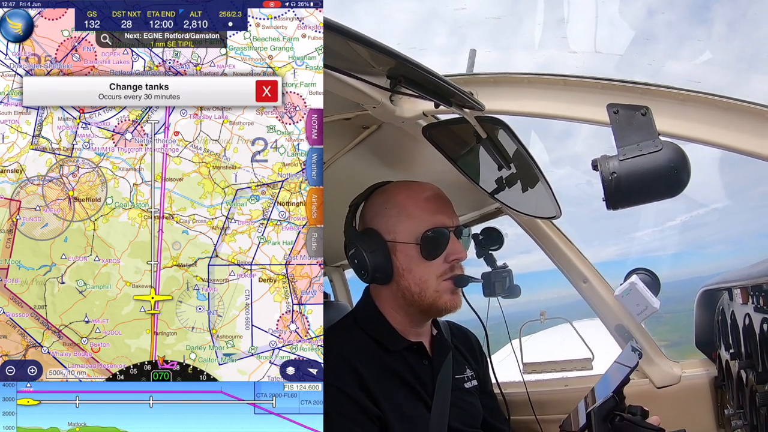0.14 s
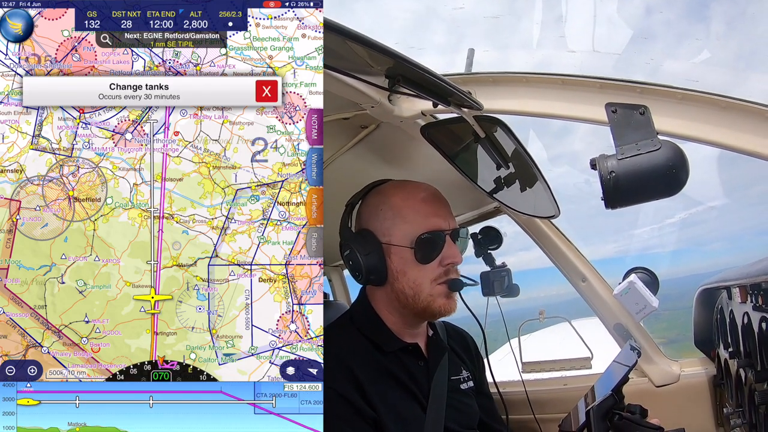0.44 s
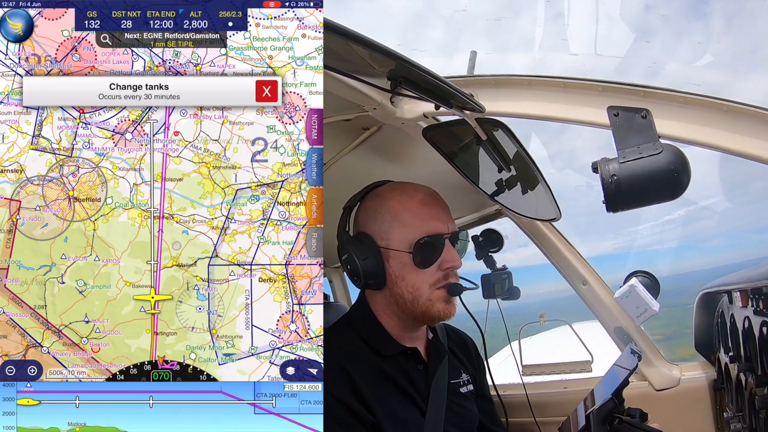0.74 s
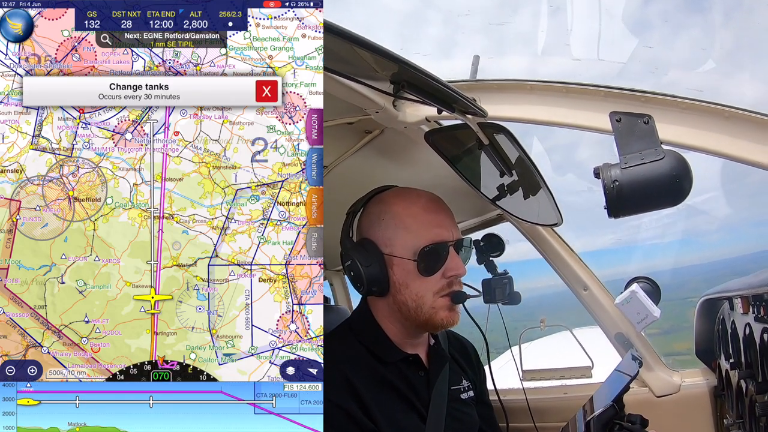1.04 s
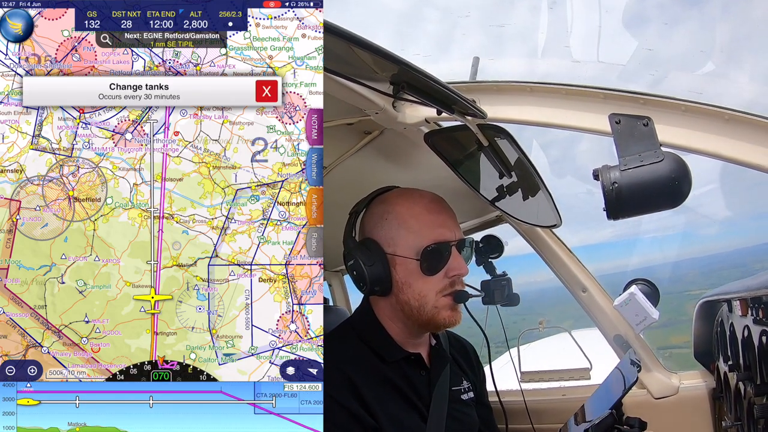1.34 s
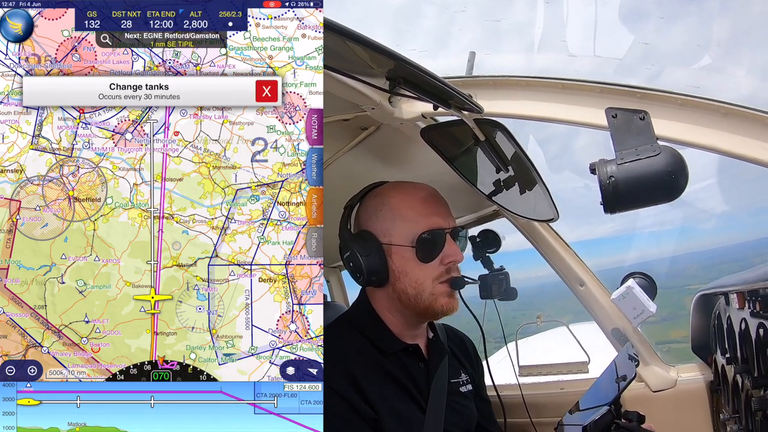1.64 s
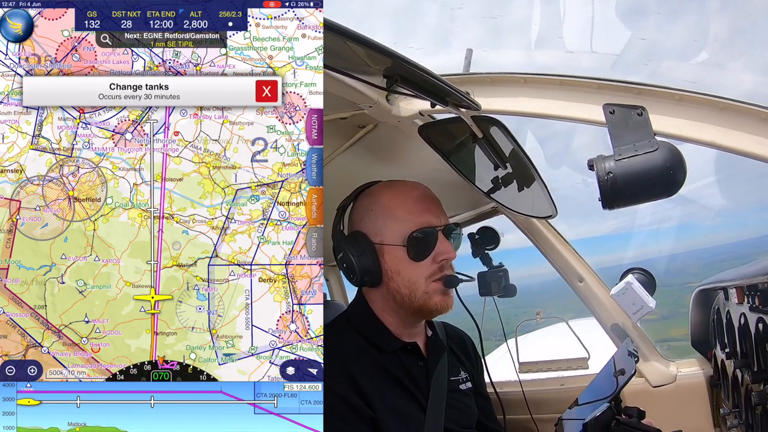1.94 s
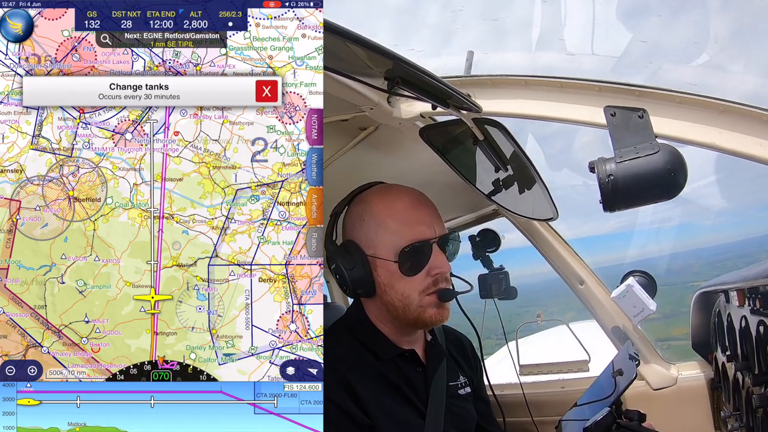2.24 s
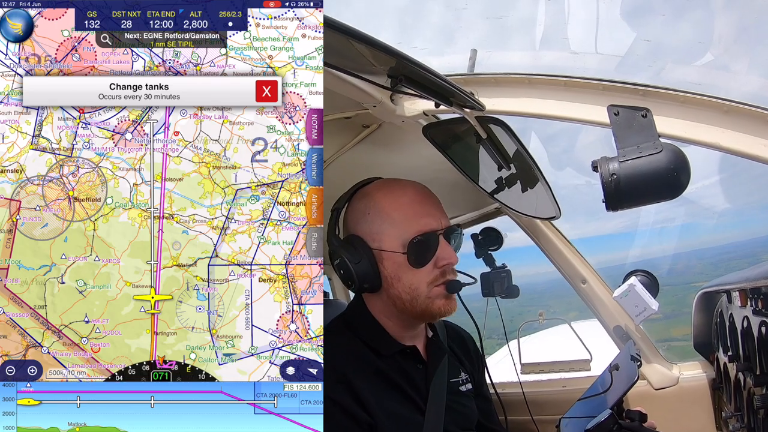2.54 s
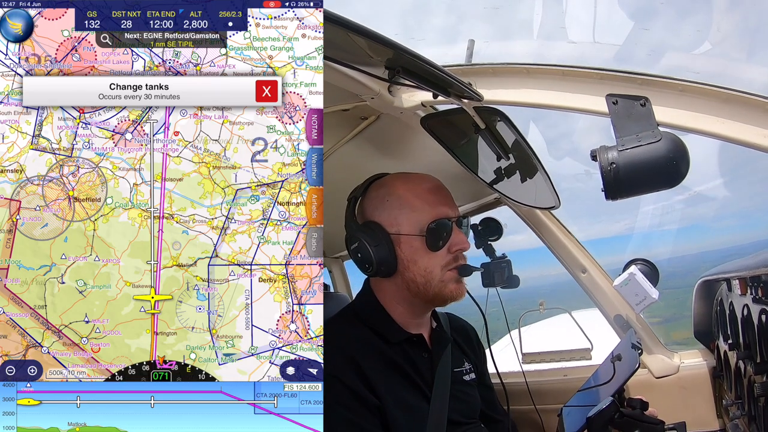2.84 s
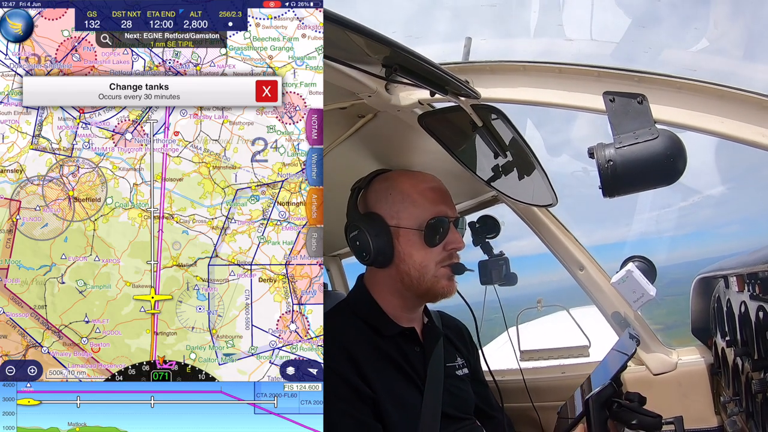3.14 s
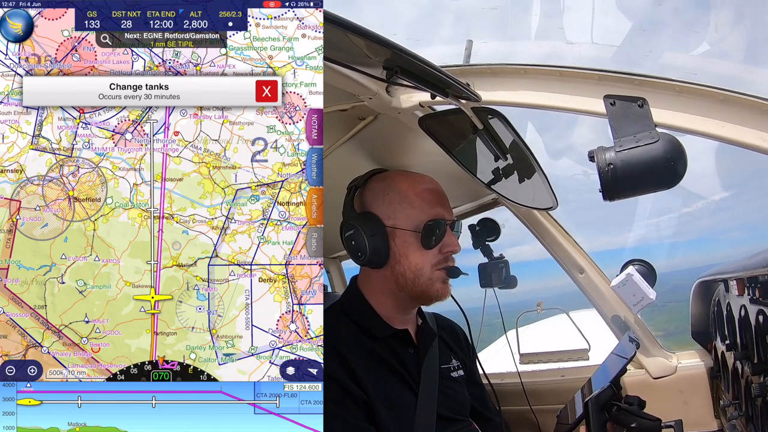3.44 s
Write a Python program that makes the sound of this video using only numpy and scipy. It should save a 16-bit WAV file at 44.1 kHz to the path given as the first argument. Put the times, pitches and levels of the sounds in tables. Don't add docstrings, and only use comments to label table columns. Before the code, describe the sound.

Steady throbbing drone of a light piston aircraft engine and propeller, heard inside the cockpit

```python
import sys
import numpy as np
from scipy import signal
from scipy.fft import rfft, irfft
from scipy.io import wavfile
from scipy.ndimage import uniform_filter1d

SR = 44100
rng = np.random.default_rng(int(sys.argv[2]) if len(sys.argv) > 2 else 0)


def to_wav(s):
    ch = np.atleast_2d(s).T
    pcm = np.round(np.clip(ch, -1, 1) * 32767)
    wavfile.write(sys.argv[1], SR, pcm.astype(np.int16))


def amplitude_ratio(level_db):
    exponent = np.asarray(level_db, float) / 20
    return 10 ** exponent


N = 158760

# t/s, f/Hz
SHAFT_SPEED = [
    (0, 39.86),
    (.8, 39.81),
    (1.9, 39.81),
    (2.4, 39.71),
    (2.8, 39.65),
    (3.6, 39.65),
]
# level/dB, left-right level/dB, left lead/rad
HALF_ORDERS = [(-33.7, -1.0, 0.3), (-43.1, 0.2, 0.23), (-31.6, 2.0, 0.16), (-37.8, 0.8, -0.05),
               (-29.2, -0.0, -0.57), (-47.0, -2.2, -0.24), (-34.7, 1.8, -0.04), (-39.9, -0.5, -0.01),
               (-46.9, -2.2, -0.01), (-47.4, 2.2, -0.05), (-39.2, 4.5, 0.43), (-50.7, -3.3, -0.35),
               (-57.5, -2.3, -0.2), (-46.8, -0.9, -0.22), (-44.0, -2.0, 0.19), (-56.6, 1.5, 0.17),
               (-36.5, 1.7, 0.0), (-51.7, 0.9, -0.09), (-44.1, 0.6, -0.1), (-54.6, 0.1, -0.32),
               (-65.3, 11.1, -0.74), (-60.3, -4.4, 0.14), (-45.0, 3.3, 0.14), (-52.5, 2.5, -0.39),
               (-56.8, -1.1, -0.22), (-62.6, 2.8, 0.42), (-56.6, 0.9, -0.65), (-60.3, -1.0, 0.31),
               (-54.4, 3.3, 0.72)]
# f/Hz, level/dB
RUMBLE_CENTRE = [(12, -18), (24, -11), (48, -11), (58, 1.5), (105, -3.5), (135, -6), (290, -12),
                 (410, -16.5), (600, -22), (900, -78)]
# f/Hz, level/dB
RUMBLE_SIDE = [(10, -14), (22, -3), (60, 9), (135, -8), (190, -2), (330, -4), (420, -5.5), (600, -11),
               (900, -61)]
# f/Hz, level/dB
ROAR_CENTRE = [(350, -46), (600, -0.5), (1420, -3), (1870, -4), (2320, -1.5), (2860, -5.5), (5100, -20),
               (9230, -22.5), (10800, -38), (14000, -74), (22000, -120)]
# f/Hz, level/dB
ROAR_SIDE = [(350, -36), (600, -4), (1520, -2.5), (1680, -4.5), (2240, 1), (4200, -16.5), (5900, -13.5),
             (9230, -18), (10800, -35), (14000, -67), (22000, -120)]
# f/Hz, width/Hz, level/dB
PANELS_CENTRE = [(3810, 80, -4), (1175, 50, 3), (1425, 70, 4), (1750, 40, 3), (2125, 60, -5), (2385, 60, 3),
                 (2600, 70, -5), (2755, 60, 4), (3120, 90, 4), (3260, 70, -3), (3520, 120, 2),
                 (4360, 150, 4), (6070, 120, 3), (7340, 300, 3)]
# f/Hz, width/Hz, level/dB
PANELS_SIDE = [(1175, 120, 3), (1310, 80, -2), (1545, 100, 4), (1680, 80, -3), (1850, 80, 7),
               (1980, 90, -2), (2185, 50, 3), (2460, 40, -4), (2720, 100, 3), (3010, 100, 4),
               (3260, 60, -4), (3330, 90, 3), (3750, 80, -4)]
# f/Hz, level/dB
HISS = [(8000, -30), (10300, -7), (11400, -8), (12000, -4), (14500, -9), (14950, -1), (15140, -5),
        (16000, -60)]
# f/Hz, width/Hz, level/dB
HISS_RINGS_CENTRE = [(11220, 100, 12), (11480, 120, -6), (12500, 300, -3)]
# f/Hz, width/Hz, level/dB
HISS_RINGS_SIDE = [(14000, 800, 3), (14950, 500, -18)]
# f/Hz, left-right level/dB
PORT_BALANCE = [(1300, -1), (1700, -3), (2400, 4.5), (3200, -1), (5200, -.5), (6000, -4.5), (8900, 0),
                (9400, 7), (10300, 5.5), (10900, 0)]

HUM_DB = 0.38
UPPER_DB, UPPER_SPREAD_DB = -60, 0.5
WAVER_DB, WANDER_RAD = 1.3, 0.2
LEAD_SWAY = 0.3
MOUNT_ORDER = 1.25
SCATTER_RAD = 0.12
SWELL_DB, GUST_DB = 0.4, 0.25
PATCH_DB, RIPPLE_DB = 0.6, 0.9
LINKED, LINK_HZ = 0.45, 4500
SQUEEZE, SQUEEZE_S = 0.38, 0.012


def engine_and_propeller():
    hop = 10
    t = np.arange(0, N, hop) / SR
    slow = np.arange(0, N / SR + 0.1, 0.01)

    def wobble(lo_hz, hi_hz):
        return np.interp(t, slow, drift(slow, lo_hz, hi_hz))

    shaft_angle = 2 * np.pi * np.cumsum(np.interp(t, *np.transpose(SHAFT_SPEED))) * hop / SR
    valve_train = [(UPPER_DB + UPPER_SPREAD_DB * a, 2 * b, 0.5 * c)
                   for a, b, c in rng.standard_normal((17, 3))]
    hum = np.zeros((2, len(t)))
    for k, (db, pan_db, lead) in enumerate(list(HALF_ORDERS) + valve_train):
        order = 1 + k / 2
        level = np.sqrt(2) * amplitude_ratio(db + HUM_DB + WAVER_DB * wobble(0.44, 3.7))
        mount_flip = np.pi / (1 + (order / MOUNT_ORDER) ** 4)
        scatter = SCATTER_RAD * order + np.pi * (k % 2)
        start = mount_flip + scatter * rng.standard_normal()
        phase = order * shaft_angle + start + WANDER_RAD * wobble(0.392, 4.5)
        lead = lead * (1 + LEAD_SWAY * wobble(0.27, 1.94))
        pan = amplitude_ratio([[pan_db / 2], [-pan_db / 2]])
        hum += level * pan * np.cos([phase + lead / 2, phase - lead / 2])
    return signal.resample_poly(hum, hop, 1, axis=1, window=("kaiser", 10))[:, :N]


def slipstream_roar():
    t, centre, side = linked_spectra(2048)
    gust = GUST_DB * drift(t, 0.535, 12)
    return np.array([coloured_noise(ROAR_CENTRE, -29, PANELS_CENTRE, gust, centre, 2048),
                     coloured_noise(ROAR_SIDE, -33.5, PANELS_SIDE, gust, side, 2048)])


def airframe_rumble():
    t, centre, side = linked_spectra(8192)
    swell = SWELL_DB * drift(t, 0.24, 1.94)
    return np.array([coloured_noise(RUMBLE_CENTRE, -25.5, [], swell, centre, 8192),
                     coloured_noise(RUMBLE_SIDE, -40, [], swell, side, 8192)])


def air_hiss():
    t, centre, side = linked_spectra(2048)
    gust = GUST_DB * drift(t, 0.535, 12)
    return np.array([coloured_noise(HISS, -67, HISS_RINGS_CENTRE, gust, centre, 2048),
                     coloured_noise(HISS, -69, HISS_RINGS_SIDE, gust, side, 2048)])


def cabin_at_ports():
    centre, side = airframe_rumble() + slipstream_roar() + air_hiss()
    tilt_db = read_spectrum(PORT_BALANCE, np.fft.rfftfreq(N, 1 / SR)) / 2
    return irfft(rfft([centre + side, centre - side]) * amplitude_ratio([tilt_db, -tilt_db]), N)


def linked_spectra(size):
    bins = size // 2 + 1
    t = np.arange(4 * N // size + 6) * size / 4 / SR
    a, b, c, d = rng.standard_normal((len(t), bins, 4)).T
    centre = a + 1j * b
    apart = c + 1j * d
    wind = 1j * np.sqrt(2) * np.cos(np.cumsum(0.38 * rng.standard_normal(bins)))[:, None]
    hz = np.fft.rfftfreq(size, 1 / SR)[:, None]
    tie = LINKED / (1 + (hz / LINK_HZ) ** 4)
    return t, centre, tie * wind * centre + np.sqrt(1 - tie ** 2) * apart


def coloured_noise(shape, db, rings, swell_db, spectra, size):
    hz = np.fft.rfftfreq(size, 1 / SR)
    patch = uniform_filter1d(rng.standard_normal(spectra.shape), size=20, axis=0)
    patch = evened(uniform_filter1d(patch, size=6, axis=1))
    ripple = evened(uniform_filter1d(rng.standard_normal(len(hz)), size=2))
    colour_db = read_spectrum(shape, hz) + RIPPLE_DB * ripple
    for ring_hz, width_hz, ring_db in rings:
        colour_db = colour_db + ring_db / (1 + (2 * (hz - ring_hz) / width_hz) ** 2)
    frames = spectra * amplitude_ratio(colour_db[:, None] + PATCH_DB * patch + swell_db)
    sound = signal.istft(frames, nperseg=size, noverlap=size * 3 // 4)[1][:N]
    return amplitude_ratio(db) * evened(sound)


def evened(x):
    return x / np.sqrt(np.mean(x ** 2) + 1e-20)


def read_spectrum(points, hz):
    f, value = np.transpose(points)
    return np.interp(np.log(hz + 1), np.log(f + 1), value)


def drift(t, lo_hz, hi_hz):
    hz = np.geomspace(lo_hz, hi_hz, num=16)[:, None]
    sines = np.sin(2 * np.pi * (hz * t + rng.random(hz.shape)))
    return evened((sines / np.sqrt(hz)).sum(0))


def scene():
    return engine_and_propeller() + cabin_at_ports()


def band_limit(x):
    return signal.sosfilt(signal.butter(12, 15140, fs=SR, output="sos"), x)


def record(dry):
    span = int(SQUEEZE_S * SR)
    power = uniform_filter1d(uniform_filter1d((dry ** 2).mean(0), span), span)
    power_db = 10 * np.log10(power + 1e-9)
    mix = dry * amplitude_ratio(-SQUEEZE * (power_db - power_db.mean()))
    return band_limit(mix)


dry = scene()
out = record(dry)
to_wav(out)
```